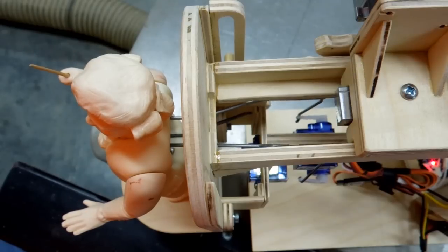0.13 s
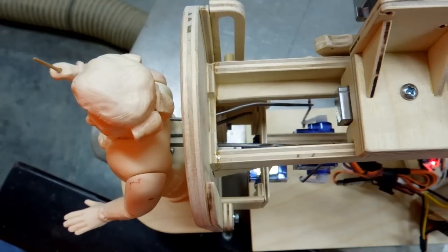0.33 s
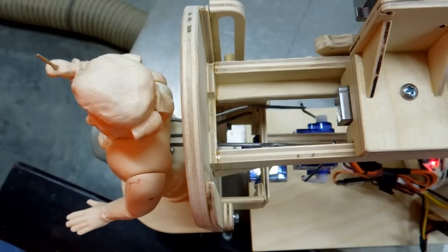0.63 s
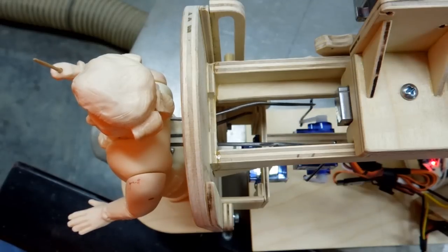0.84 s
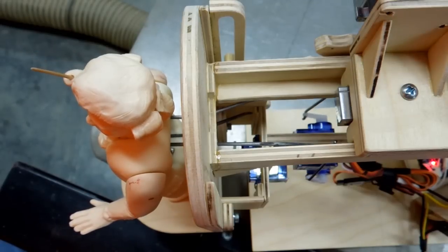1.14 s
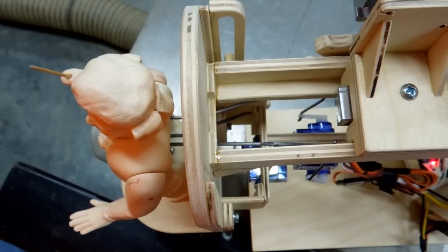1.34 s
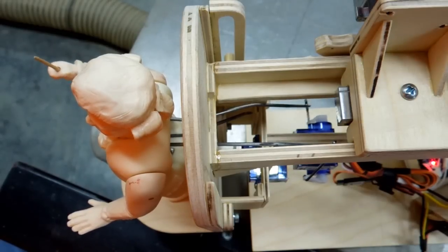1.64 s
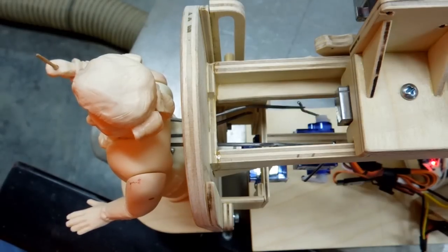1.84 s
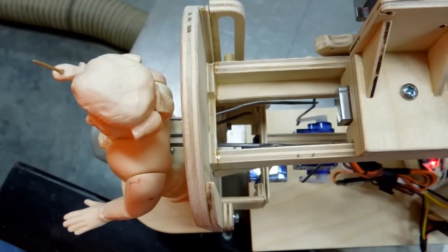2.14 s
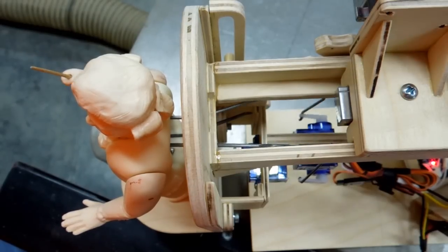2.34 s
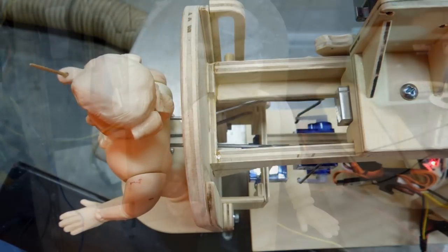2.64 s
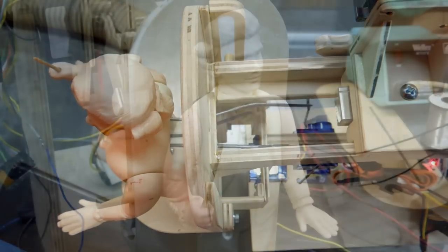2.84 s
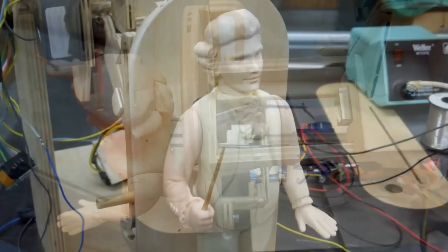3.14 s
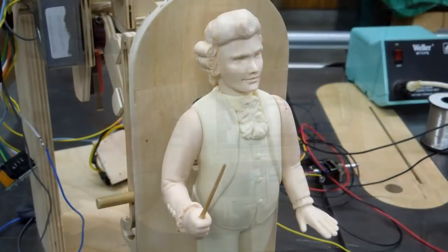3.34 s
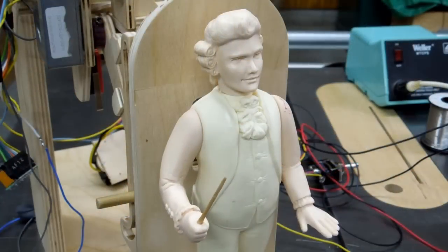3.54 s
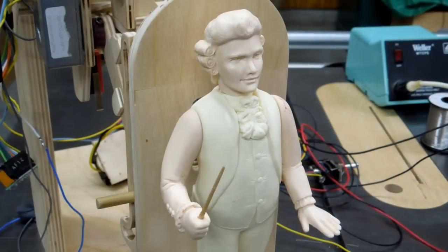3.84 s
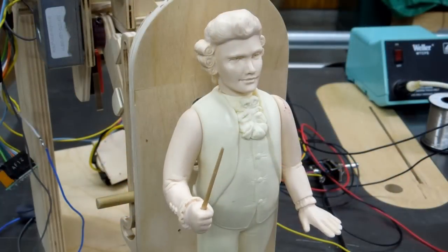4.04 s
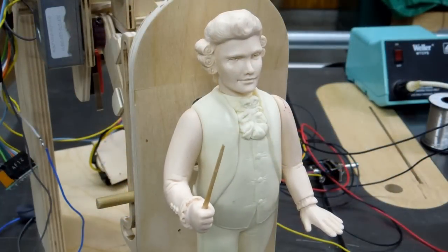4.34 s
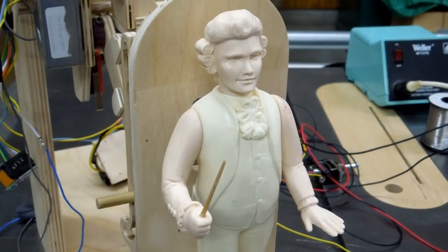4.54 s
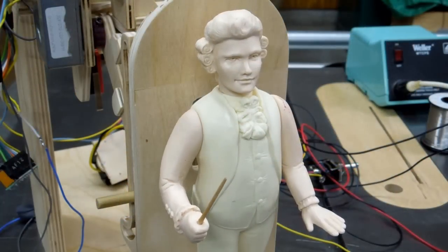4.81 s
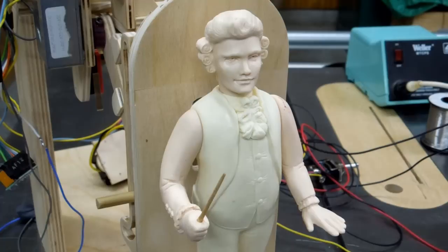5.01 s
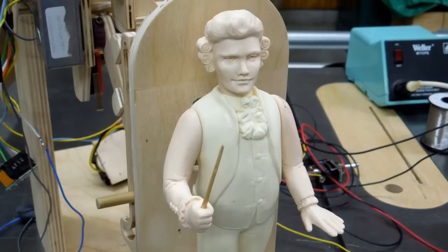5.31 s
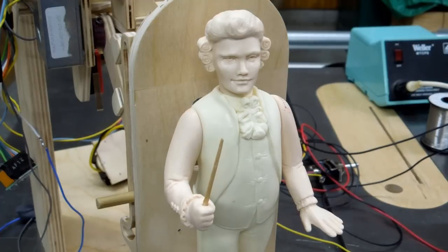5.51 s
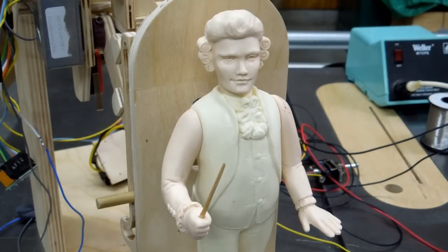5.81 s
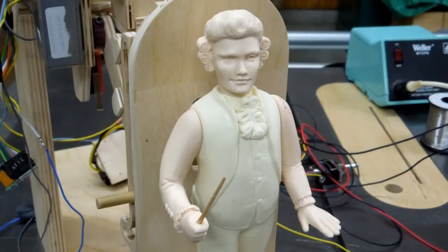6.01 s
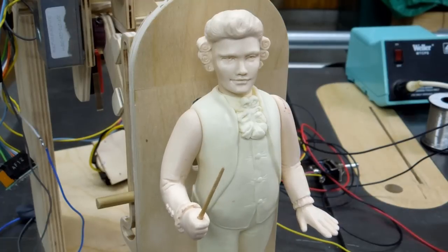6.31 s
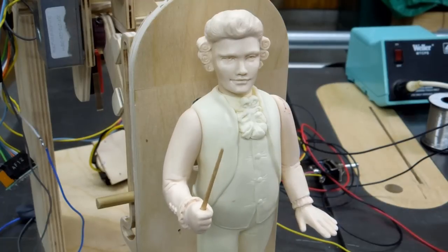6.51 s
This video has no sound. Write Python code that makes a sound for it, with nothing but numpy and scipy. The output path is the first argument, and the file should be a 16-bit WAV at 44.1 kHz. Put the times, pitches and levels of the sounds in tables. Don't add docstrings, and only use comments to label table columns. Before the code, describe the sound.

A tiny servo drives a puppet-like figure's arm up and down. Its plastic gears make a dry, bright, rasping buzz with a fast flutter, broken by very short dips about every 0.6 seconds as the arm reverses. Heard close beside an open wooden frame, then, after a smooth crossfade around three seconds, from the front, with clearer low machine hum. Small indoor workshop, short reflections, close stereo microphone.

```python
import sys
import numpy as np
from scipy import signal
from scipy.fft import rfft, irfft
from scipy.io import wavfile
from scipy.ndimage import uniform_filter1d

SR = 44100
rng = np.random.default_rng(int(sys.argv[2]) if len(sys.argv) > 2 else 0)


def wav_record(signal):
    frames = np.transpose(np.atleast_2d(signal))
    bounded = np.clip(frames, -1, 1)
    quanta = np.round(bounded * 32767).astype(np.int16)
    wavfile.write(sys.argv[1], SR, quanta)


def to_linear_factor(level_db):
    exponent = np.asarray(level_db, float) / 20
    return 10 ** exponent


N = 293706
TIME = np.arange(N) / SR
CYCLE_S = 1.2392
LEAD_IN = 64

# (pitch [Hz], level [dB])
WIDTH = [(60, -11.5), (200, -9), (700, -3.5), (1300, -19), (3000, -16.5), (6000, -14.5), (8000, -10),
         (14000, -5.5)]


def evened(x):
    return x / np.sqrt(np.mean(x ** 2) + 1e-20)


def read(points, hz):
    f, value = np.transpose(points)
    return np.interp(np.log(hz + 1), np.log(f + 1), value)


def add(mix, start, sound):
    part = mix[:, start:start + sound.shape[1]]
    part += sound[:, :part.shape[1]]


def drift(hz, count=N):
    noise = rng.standard_normal(count)
    return evened(signal.lfilter([1], [1, -np.exp(-2 * np.pi * hz / SR)], noise))


def bump(t, s, ms):
    return to_linear_factor(-6 * ((t - s) * 2000 / ms) ** 2)


def positions(late=1):
    front = np.interp(TIME, [2.6, 3.45], [0, 1])
    return 1 - front, front ** late


def servo():
    # (pitch [Hz], width [Hz], level [dB])
    beside_modes = [
        [(1450, 46, -11), (1920, 57, -18), (3020, 57, -16.5), (4125, 76, -9.5), (5720, 190, -6.5), (6250, 100, -2.5), (7420, 170, 5), (8860, 330, 5.5), (10070, 180, 1.5), (11600, 800, -1.5), (12480, 130, -6), (13300, 140, -11), (14100, 300, -0.5)],
        [(1890, 64, -21), (2114, 13, -14.5), (2960, 87, -16), (4590, 240, -11), (3590, 40, -9), (4110, 120, -6.5), (5900, 450, -7), (7280, 200, -2.5), (10980, 200, -5.5), (9990, 97, 1), (11440, 210, 1.5), (13350, 190, -5), (14300, 230, -7)],
    ]
    # (pitch [Hz], width [Hz], level [dB])
    front_modes = [
        [(1393, 25, -5), (1750, 130, -18), (2956, 26, -3), (3670, 32, -1), (4340, 190, -3), (5380, 140, 0), (6650, 74, 1.5), (7100, 105, 3), (8100, 32, -2), (8440, 700, -1.5), (10300, 170, 1.5), (10930, 170, 1.5), (11850, 340, 0.5), (13130, 380, -3)],
        [(1380, 38, -18.5), (1960, 22, -11.5), (3880, 260, -4), (4740, 96, -9), (5390, 81, 1), (6990, 140, -1), (7700, 110, -2.5), (8430, 73, -0.5), (9400, 160, -6), (10500, 280, -2.5), (11000, 140, -13), (11720, 130, 2.5), (12600, 220, -3), (14270, 300, -1.5)],
    ]
    # (pitch [Hz], level [dB])
    broad_rattle = [
        [(530, -61), (900, -41), (1490, -25), (2230, -45), (4100, -25.5), (5000, -19.5), (6460, -10.5), (7340, 3.5), (11600, -7), (14600, -7.5)],
        [(530, -58), (900, -65), (1370, -14), (2080, -19.5), (4190, 5), (5000, -7.5), (5420, -26), (5950, -2), (11600, -3.5), (14600, -36)],
    ]
    # (pitch [Hz], width [Hz], change [dB])
    reflections = [
        [(2490, 250, 1), (3146, 69, -9), (3870, 93, -2.5), (5020, 340, -3.5), (9700, 130, 4.5)],
        [(2300, 800, -1.5), (5200, 520, -3), (6200, 300, -2), (9700, 210, -2)],
    ]
    # (time after the bottom [s], rattle [dB])
    gear_load = [
        [(0.045, -23), (0.139, -24), (0.234, -23), (0.328, -23.5), (0.423, -23), (0.517, -21.5), (0.612, -20), (0.648, -26), (0.747, -23.5), (0.845, -23), (0.944, -30), (1.042, -25), (1.141, -20), (1.239, -24.5)],
        [(0.05, -31.5), (0.143, -29.5), (0.236, -35), (0.329, -31.5), (0.422, -28.5), (0.515, -30.5), (0.608, -24.5), (0.652, -27), (0.75, -29.5), (0.848, -31.5), (0.946, -34), (1.043, -34.5), (1.141, -30), (1.239, -28.5)],
    ]
    # (motor stops [s], quietest [s], motor restarts [s], depth [dB], share that falls at once [0-1])
    turn_stops = [
        [(0, .035, .040, -18, .6), (.616, .632, .641, -16, .6)],
        [(0, .030, .036, -11, .3), (.613, .638, .644, -8, .45)],
    ]
    # (lifting [dB], dropping [dB], share of load [0-1], knock [dB], let-down step [dB])
    case_and_frame = [
        [(-34, -35, 0.53, 1.5, -0.1), (-48, -46.5, 0.36, 6, -0.1)],
        [(-34.5, -36, .75, -8, 2.5), (-46.5, -46, 0.56, 3.5, 4)],
    ]
    # (time after the bottom [s], change [dB], length [ms])
    beside_catches = [(0.06, -2.5, 8), (0.085, 0.5, 12), (0.11, 6.5, 18), (0.161, 1.5, 9), (0.284, 1.5, 34),
                      (0.358, 5, 12), (0.386, 3, 18), (0.406, 6, 12), (0.438, 5, 9), (0.461, 5, 9),
                      (0.487, 3, 41), (0.559, 8, 10), (0.582, 7.5, 8.1), (0.601, 5, 10), (0.663, 6, 41),
                      (0.776, 2, 22), (0.88, 4.5, 4.4), (0.942, 4.5, 12), (0.975, 4.5, 135),
                      (1.049, 2.5, 8.4), (1.09, -4.5, 10), (1.177, 6, 13), (1.198, 4, 7.1),
                      (1.229, 6.5, 23)]
    # (time after the bottom [s], change [dB], length [ms])
    front_catches = [(0.079, 2, 4.8), (0.111, 3.5, 22), (0.198, 1.5, 9), (0.22, 3.5, 9), (0.271, 5.5, 5.6),
                     (0.357, 6, 14), (0.393, 1.5, 14), (0.468, 3.5, 20), (0.502, 3.5, 22), (0.556, 1.5, 11),
                     (0.577, 2.0, 7.3), (0.671, 1.5, 19), (0.699, -3.5, 5.8), (0.748, 1, 17),
                     (0.776, 3.5, 7.5), (0.804, 3, 13), (0.861, 2, 16), (0.878, 5, 7.8), (0.938, 4, 5.6),
                     (0.975, 3, 9.2), (1.018, 2.5, 9.5), (1.095, -5, 9.1), (1.155, 4, 15), (1.18, 3, 11)]
    bottoms_s = 0.184, 3.844
    jolts_db = -0.5, 1
    leads_rad = -1.4, 1.25

    throbs_db, flutters_db = (0.9, 1.3, 2.2), (0.8, 1.3, 1.4)
    lurch_shares, pause_shares = (1, 0.6, 0.4), (0.95, 0.5, 0.3)
    bands_hz = (5200, 14600), (2600, 5200), (1100, 2600)
    contacts, shared = 4, 0.35

    out, common, kicks = np.zeros((2, N)), teeth(), motor()
    shake_db = 0.3 * drift(57.0)
    hits = []
    for throb_db, flutter_db in zip(throbs_db, flutters_db):
        impacts = shared * common + np.sqrt(1 - shared ** 2) * teeth()
        hits.append(to_linear_factor(throb_db * kicks + flutter_db * drift(40.0)) * impacts)
    favour = [2.5 * drift(15.0) + rng.standard_normal(N) for _ in range(contacts)]
    contact = np.argmax(favour, axis=0)

    for gain, bottom, load, jolt_db, catches, stops, parts, modes, *place in zip(
            positions(late=1.94), bottoms_s, gear_load, jolts_db, (beside_catches, front_catches),
            turn_stops, case_and_frame, (beside_modes, front_modes),
            broad_rattle, reflections, leads_rad):
        phase = (TIME - bottom) % CYCLE_S
        lifting = (phase > stops[0][1]) & (phase < stops[1][1])
        lurch_db = lurches(catches, bottom) + shake_db
        pause_db = pauses(stops, phase)
        levels_db = efforts(load, jolt_db, parts, phase, lifting)
        force = [gain * hit * to_linear_factor(db + follow * lurch_db + rest * pause_db)
                 for hit, db, follow, rest in zip(hits, levels_db, lurch_shares, pause_shares)]
        force[0] = sharpened(force[0], levels_db[0] + lurch_db)
        bodies = [[[body(way, *place, lo, hi) for _ in range(contacts)]
                   for lo, hi in bands_hz] for way in modes]
        turns = [0, *np.flatnonzero(np.diff(lifting)) + 1, N]
        for span in map(slice, turns, turns[1:]):
            if not gain[span].any():
                continue
            stroke = bodies[int(lifting[span.start])]
            for blows, band in zip(force, stroke):
                for k, response in enumerate(band):
                    here = blows[span] * (contact[span] == k)
                    add(out, span.start, signal.fftconvolve(here[None], response, axes=1))
    return np.roll(out, -LEAD_IN, axis=1)


def teeth(per_s=9000, spread_db=3.0):
    hardness_db = spread_db * np.minimum(rng.exponential(1, N), 3.2)
    size = to_linear_factor(hardness_db) * rng.choice([-1, 1], N)
    return evened(size * (rng.random(N) < per_s / SR))


def motor(control_hz=50, uneven=0.65):
    frame = TIME * control_hz
    chance = np.clip(rng.standard_normal(int(frame[-1]) + 1), -1.5, 1.5)
    kick = 1 + uneven * chance[frame.astype(int)]
    return uniform_filter1d(kick * (1 - 2 * (frame % 1)), size=140)


def efforts(load, jolt_db, parts, phase, lifting):
    step_s, step_at_s, step_ms = 0.04, 0.818, 8.5
    gears_db = np.interp(phase, *np.transpose(load))
    steps = ~lifting * bump((phase - step_at_s + step_s / 2) % step_s, step_s / 2, step_ms)
    knock = bump(phase, 0.615, 23)
    levels_db = [gears_db + jolt_db * steps]
    for up_db, down_db, share, knock_db, step_db in parts:
        slow_db = np.where(lifting, up_db, down_db) + share * (gears_db - gears_db.mean())
        levels_db.append(slow_db + knock_db * knock + step_db * steps)
    return levels_db


def lurches(table, bottom, uneven=0.13):
    t = TIME[::32] - bottom
    s, db, ms = np.transpose(table)[:, :, None]
    cycle = (t // CYCLE_S).astype(int)
    chance = 1 + uneven * rng.standard_normal((len(table), 12))[:, cycle]
    change_db = (db * chance * bump(t % CYCLE_S, s, ms)).sum(0)
    return np.interp(TIME - bottom, t, change_db)


def pauses(table, phase):
    restart, edge, spin_up = 0.25, 0.0025, 0.016
    t = (phase + 2 * edge) % CYCLE_S - 2 * edge
    total_db = 0
    for stop, low, start, db, drop in table:
        times = [stop - edge, stop + edge, low, start, start + edge, start + edge + spin_up]
        levels = [0, drop * db, db, 2 * restart * db, restart * db, 0]
        total_db = total_db + np.interp(t, times, levels)
    return total_db


def sharpened(blows, load_db):
    treble = signal.firwin(63, 10260, pass_zero=False, fs=SR)
    top = signal.oaconvolve(blows, treble, "same")
    brighten = 0.28
    return blows + (to_linear_factor(brighten * (load_db - load_db.mean())) - 1) * top


def body(modes, broad, notches, lead, lo_hz, hi_hz):
    broad_db, ripple_db, strike_db = -4, 1.2, 1.6
    detune, damping, scatter = 0.009, 1.4, 1.6
    hz = np.fft.rfftfreq(2048, 1 / SR)
    power = to_linear_factor(2 * (read(broad, hz) + broad_db))
    for (f, width, db), (shift, strike) in zip(modes, rng.standard_normal((len(modes), 2))):
        off = 2 * (hz - f * (1 + detune * shift)) / (width * damping)
        power = power + to_linear_factor(2 * (db + strike_db * strike)) / (1 + off ** 2)
    for f, width, db in notches:
        power = power * to_linear_factor(2 * db / (1 + (2 * (hz - f) / width) ** 2))
    edges = 1 / np.sqrt((1 + (lo_hz / (hz + 1)) ** 24) * (1 + (hz / hi_hz) ** 24))
    chance = uniform_filter1d(rng.standard_normal((2, len(hz))), size=24)
    ripple, turn = (evened(v) for v in chance)
    mid = np.roll(ring(np.sqrt(power) * edges * to_linear_factor(ripple_db * ripple)), LEAD_IN)
    side = irfft(rfft(mid) * to_linear_factor(read(WIDTH, hz)) * np.exp(1j * (lead + scatter * turn)))
    return np.array([mid + side, mid - side]) / np.linalg.norm(mid)


def ring(gain):
    log = np.log(np.maximum(np.r_[gain, gain[-2:0:-1]], 1e-4 * gain.max()))
    spectrum = np.exp(log - 1j * signal.hilbert(log).imag)
    return irfft(spectrum[:len(gain)])


def room(x, t60=0.29, first=0.0041):
    t = TIME[:SR // 3]
    tail = rng.standard_normal((2, len(t))) * to_linear_factor(-60 * t / t60) * (t > first)
    tail = tail / np.linalg.norm(tail[0])
    both = np.array([x[0] + x[1], x[0] - x[1]]) / 2
    mid, side = signal.fftconvolve(both, tail, axes=1)[:, :N]
    return np.array([mid + side, mid - side])


def hum():
    # (pitch [Hz], rms level [dB], wavering [dB])
    machines = [(26.5, -55, 1.5), (120, -57, 1.5), (360, -67, 2)]
    # (pitch [Hz], width [Hz], level [dB])
    duct = [(96.4, 3.3, -73), (192, 5.5, -69), (688, 28, -59.5)]
    tones = []
    for hz, db, waver_db in machines:
        waver = evened(uniform_filter1d(drift(0.8), size=6000))
        tones.append(to_linear_factor(db + 3.5 + waver_db * waver) * np.sin(2 * np.pi * hz * TIME))
    tones[0] *= to_linear_factor(np.interp(TIME, [5.05, 5.3, 5.5, 5.85], [0, -15, -15, 0]))
    for hz, width, db in duct:
        turn = 2 * np.pi * hz * TIME
        whistle = drift(width / 2) * np.cos(turn) + drift(width / 2) * np.sin(turn)
        tones.append(to_linear_factor(db) * whistle)
    return positions(late=0.67)[1] * sum(tones)


def air():
    # (pitch [Hz], level per Hz [dB])
    colours = [
        [(8.8, -33), (15, 1), (64, 0), (97, -3), (134, -2), (239, -4), (402, -8), (490, -8.5), (608, -8), (1100, -9.5), (1430, -44), (2420, -120)],
        [(9, -20), (20, 3), (60, 1), (100, -1), (200, -4), (400, -7.5), (600, -10.5), (900, -11), (1100, -11.5), (1700, -61), (2800, -100)],
    ]
    hz, out = np.fft.rfftfreq(N, 1 / SR), 0
    for gain, colour, db in zip(positions(), colours, (-51.5, -50.5)):
        mid, side = rfft(rng.standard_normal((2, N))) * to_linear_factor(read(colour, hz))
        side = side * to_linear_factor(read(WIDTH, hz))
        noise = irfft(np.array([mid + side, mid - side]), N)
        out = out + gain * to_linear_factor(db) * evened(noise)
    return out


def scene():
    gears = servo()
    return gears + to_linear_factor(-14.0) * room(gears) + hum() + air()


def low_pass(x):
    return signal.sosfilt(signal.butter(12, 15310, fs=SR, output="sos"), x)


def record(dry):
    ceiling, left_db = 0.95, 0.05
    rounded = ceiling * np.tanh(dry / ceiling)
    balanced = rounded * to_linear_factor(np.array([[left_db], [-left_db]]))
    limit = signal.firwin(511, 14150, window=("kaiser", 9), fs=SR)
    mix = signal.oaconvolve(balanced, limit[None], "same")
    return low_pass(mix)


dry = scene()
out = record(dry)
wav_record(out)
```